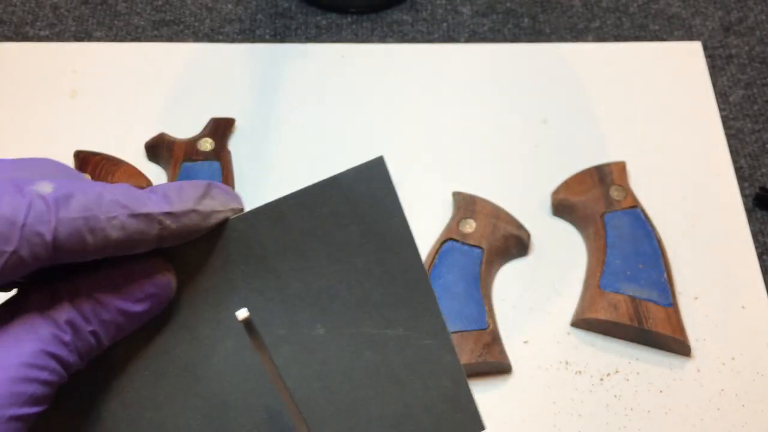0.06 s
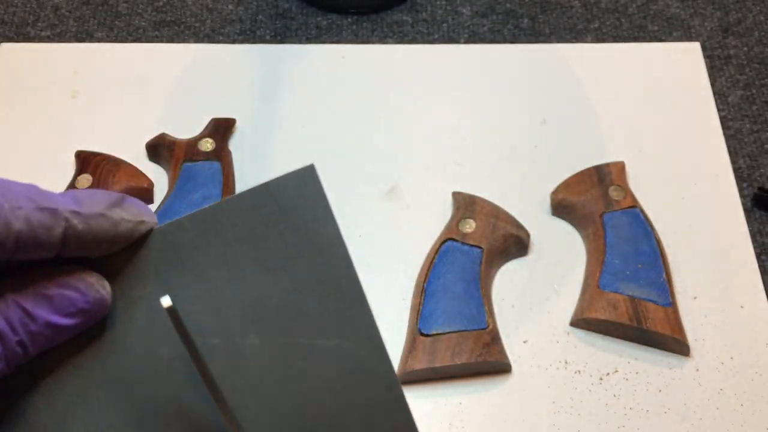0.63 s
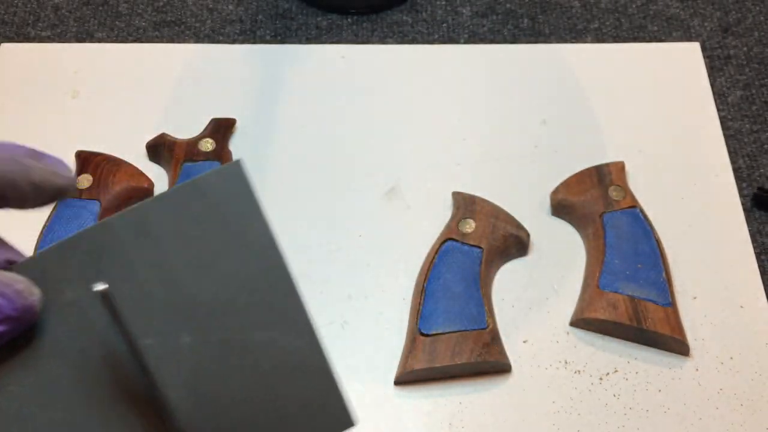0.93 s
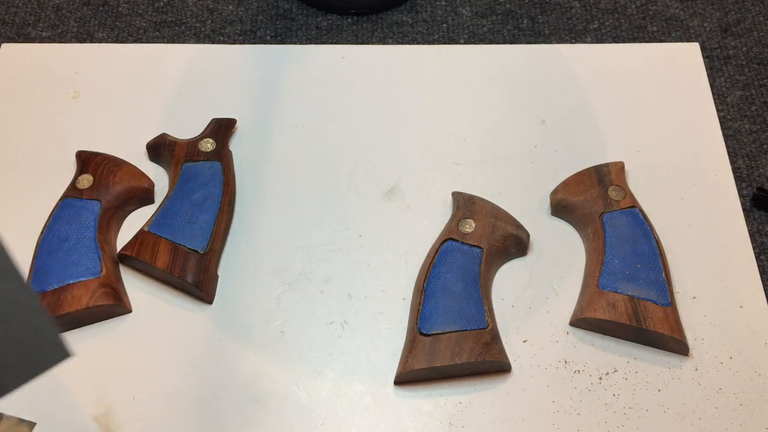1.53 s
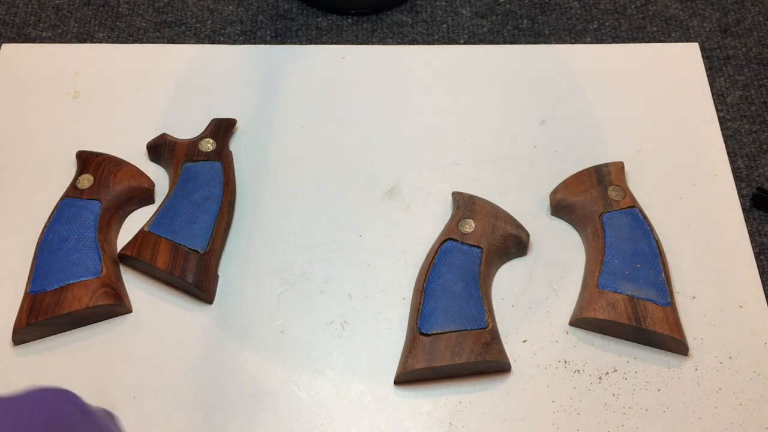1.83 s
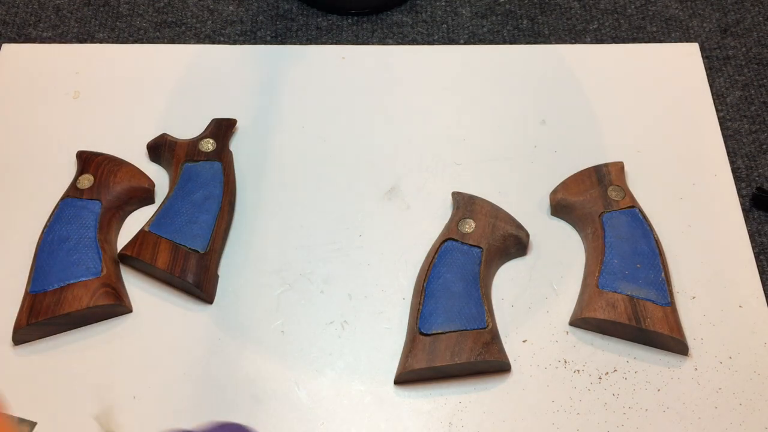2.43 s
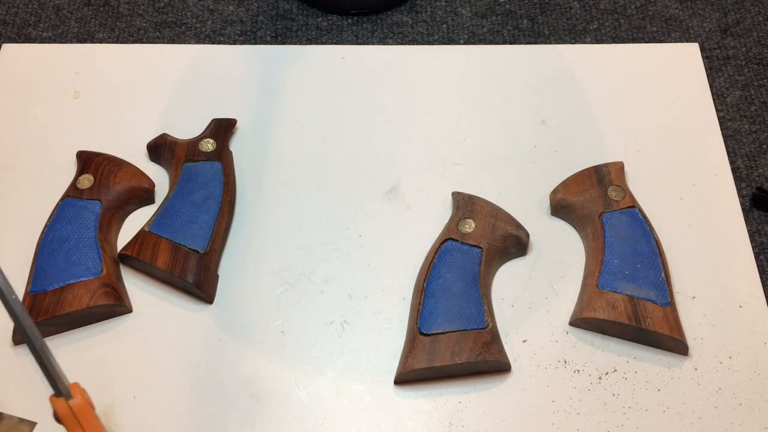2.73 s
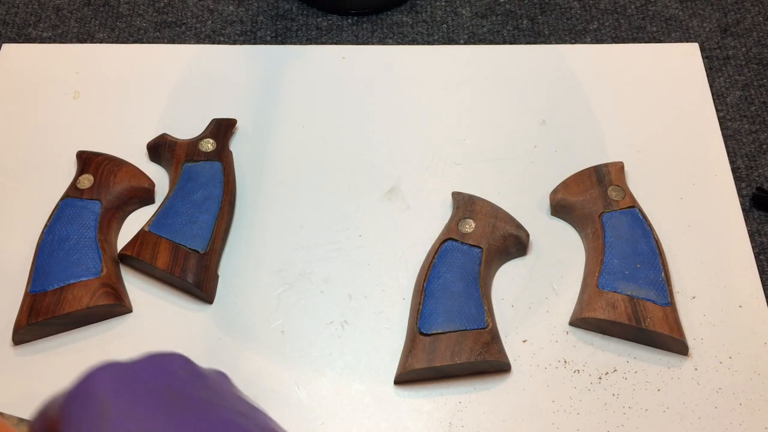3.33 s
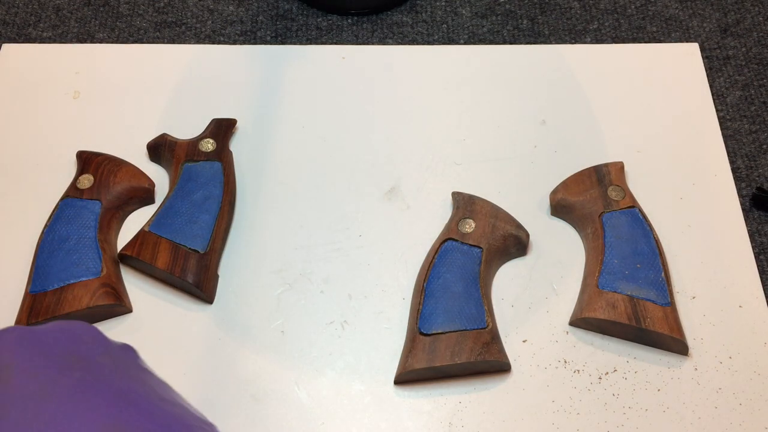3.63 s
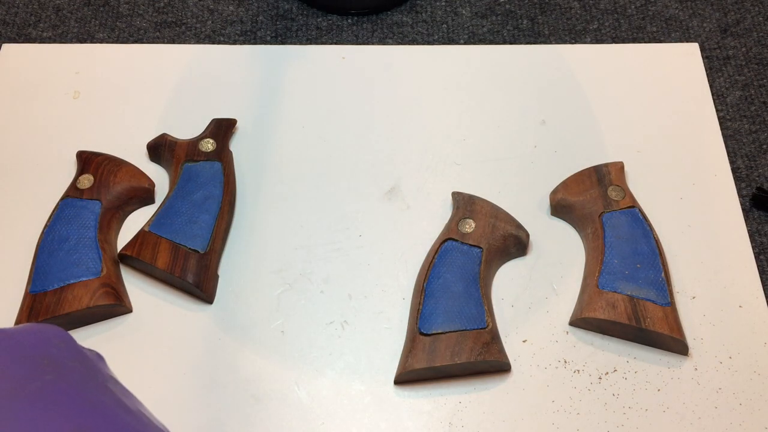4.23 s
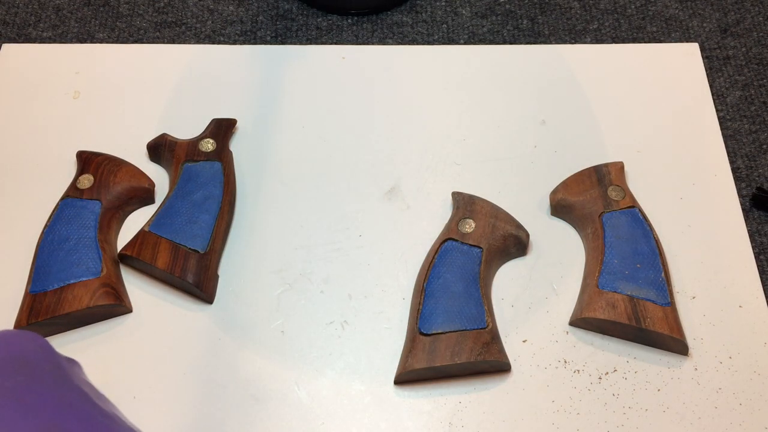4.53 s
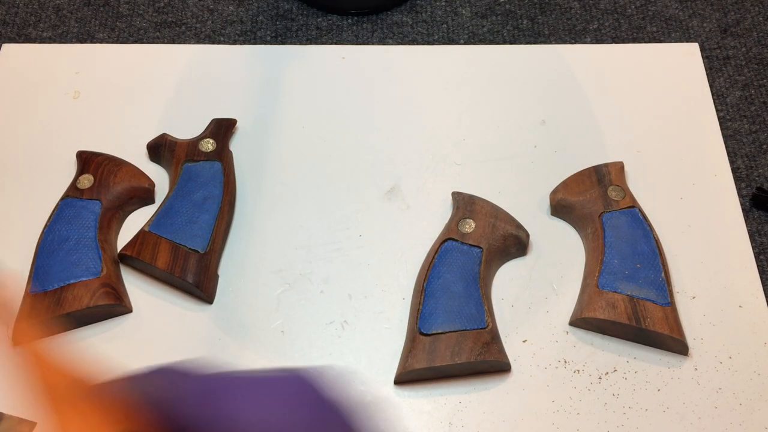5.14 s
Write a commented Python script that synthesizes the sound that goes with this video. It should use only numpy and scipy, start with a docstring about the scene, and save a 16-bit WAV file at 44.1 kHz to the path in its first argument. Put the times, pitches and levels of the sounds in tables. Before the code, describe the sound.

Sandpaper rustles and bumps a workbench, then scissors crunch through it and clack shut twice, close up in a quiet room.

```python
"""In a small room with a low ventilation hum, a sheet of sandpaper drags through gloved fingers by
stick-slip friction; it bumps the workbench, buckles, crinkles and flaps. At about 2 s scissors crunch
through the grit and clack shut, their blades ringing; tool and strip scrape, and the handles knock.
The paper slides and ticks under a rubbing, squeaking glove; a second cut ends just before 5 s.
All is close to the microphone, followed by scattering from the bench and a short reverberation."""
import sys
import numpy as np
from scipy import signal
from scipy.fft import rfft, irfft, next_fast_len
from scipy.io import wavfile
from scipy.ndimage import uniform_filter1d, map_coordinates

SR = 44100
rng = np.random.default_rng(int(sys.argv[2]) if len(sys.argv) > 2 else 0)


def master(y):
    """Save y as 16-bit WAV."""
    cut = np.clip(np.atleast_2d(y).T, -1, 1)
    pcm = np.round(cut * 32767)  # scale
    wavfile.write(sys.argv[1], SR, pcm.astype(np.int16))


N = 228349

# spectrum of the sandpaper as it is cut or crinkled: frequency_hz, gain_db
GRIT_COLOUR = [(180, -49.5), (300, -15.5), (656, -5), (737, -11), (1010, 1.5), (2030, -3.5), (2570, -2),
               (3890, -7), (5160, -5), (6850, -5.5), (9390, -16), (11500, -13.5), (13500, -21.5),
               (15000, -21.5), (16000, -28)]


def amp(db):
    """Decibels to amplitude ratio."""
    return 10 ** (np.asarray(db) / 20)


def unit(x):
    """Scale to rms 1."""
    return x / np.sqrt(np.mean(x ** 2) + 1e-20)


def peaked(x, size=128):
    """Scale so that the loudest few milliseconds have rms 1."""
    return x / np.sqrt(uniform_filter1d(x ** 2, size).max() + 1e-20)


def along(points, hz):
    """Interpolate (frequency_hz, value) points on a logarithmic frequency axis."""
    knots_hz, values = np.transpose(points)
    return np.interp(np.log(hz + 1), np.log(knots_hz + 1), values)


def wobble(rate):
    """A smooth random curve with rate knots a second."""
    knots = rng.standard_normal(int(N * rate / SR) + 4)
    return map_coordinates(knots, [np.arange(N) * rate / SR])


def add(track, start_s, sound):
    """Superpose a sound on the track."""
    part = track[round(start_s * SR):][:len(sound)]
    part += sound[:len(part)]


def coloured(x, colour, size=4096):
    """Minimum-phase filtering: folding the cepstrum makes the given spectrum causal."""
    gain = amp(along(colour, np.fft.rfftfreq(size, 1 / SR)))
    cepstrum = irfft(np.log(np.maximum(gain, 1e-6)))
    cepstrum[1:size // 2] *= 2
    cepstrum[size // 2 + 1:] = 0
    response = irfft(np.exp(rfft(cepstrum)))
    return signal.fftconvolve(x, response)[:len(x)]


def split(x, crossover_hz=4500):
    """A crossover divides a sound into body and treble."""
    return [signal.sosfilt(signal.butter(4, crossover_hz, side, fs=SR, output='sos'), x)
            for side in ('low', 'high')]


def volley(t60_s):
    """An exponentially decaying train of tiny impacts."""
    t = np.arange(SR // 4) / SR
    return rng.choice([-1, 1], len(t)) * amp(-60 * t / t60_s)


def burst(colour, t60_s, train_db=-13):
    """Impulse excitation: one sharp impact and a weaker volley drive a filter."""
    hits = amp(train_db) * volley(t60_s)
    hits[0] = 1
    return coloured(hits, colour)


def ringing(modes, scatter_db, attack_s, damping_db_per_s=0):
    """Free vibration: a sum of damped modes, excited a little differently at each blow."""
    t = np.arange(SR // 2) / SR
    ring = np.zeros(len(t))
    for hz, db, t60_s in modes:
        decay = amp(db + rng.normal(0, scatter_db) - 60 * t / t60_s)
        ring += decay * np.sin(2 * np.pi * (hz * t + rng.random()))
    onset = 1 - np.exp(-t / attack_s)
    return peaked(ring * onset * amp(-damping_db_per_s * t))


def stroke(start_s, rise_s, hold_s, curve, sag_db_per_s, release_db_per_s):
    """Envelope of one movement: a power-law rise, a slow sag, an exponential release."""
    t = np.arange(N) / SR - start_s
    rise = np.clip(t / rise_s, 0, 1) ** curve
    held_s = np.maximum(t - rise_s, 0)
    released_s = np.maximum(t - rise_s - hold_s, 0)
    return rise * amp(-sag_db_per_s * held_s - release_db_per_s * released_s)


def pressing(strokes, curve, sag_db_per_s, release_db_per_s, brighten):
    """Gains of body and treble: strokes add in power, and the treble grows faster with pressure."""
    body, treble = np.zeros(N), np.zeros(N)
    for start_s, rise_s, hold_s, level_db, treble_db in strokes:
        pressure = stroke(start_s, rise_s, hold_s, curve, sag_db_per_s, release_db_per_s)
        body = np.hypot(body, amp(level_db) * pressure)
        treble = np.hypot(treble, amp(level_db + treble_db) * pressure ** brighten)
    return body, treble


def grit(grains_per_s, spread_db):
    """Shot noise: grains catch at random moments, many faintly, a few strongly."""
    catches = rng.random(N) < grains_per_s / SR
    sizes = amp(spread_db * np.minimum(rng.standard_normal(N), 2))
    return unit(catches * sizes * rng.choice([-1, 1], N))


def bending(x, depth_db, size=512):
    """Time-varying filtering: the resonances of a sheet come and go as it bends."""
    spectra = signal.stft(x, nperseg=size)[2]
    field = uniform_filter1d(rng.standard_normal(spectra.shape), size=4, axis=0)  # across frequency
    field = uniform_filter1d(field, size=7, axis=1)  # across time
    return signal.istft(spectra * amp(depth_db * unit(field)), nperseg=size)[1][:N]


def friction(gains, colour, grains_per_s, spread_db, judder_db, bend_db):
    """Source and filter: grit drives a resonant body, and stick-slip makes the level judder."""
    body_gain, treble_gain = gains
    vibration = coloured(grit(grains_per_s, spread_db), colour)
    body, treble = split(bending(vibration, bend_db))
    judder = unit(amp(judder_db * (wobble(200) + 0.78 * wobble(60))))
    return judder * (unit(body) * body_gain + unit(treble) * treble_gain)


def ventilation():
    """Broadband air noise lies under low tones that waver in amplitude and phase."""
    # ventilation tones: pitch_hz, level_db
    hum = [(60, -72), (186, -64), (220.5, -63)]
    # spectrum of the moving air: frequency_hz, gain_db
    air_colour = [(15, -62), (25, -27.5), (47, -8), (127, -8), (153, -12.5), (170, -2.5), (223, -5.5),
                  (317, -11), (503, -24.5), (863, -22), (1230, -29.5), (1650, -29), (1890, -31),
                  (4490, -35), (16000, -45.5)]
    t = np.arange(N) / SR
    tones = sum(amp(db + 3.1 * wobble(8.3)) * np.sin(2 * np.pi * hz * t + 0.84 * wobble(7.3))
                for hz, db in hum)
    air = unit(coloured(rng.standard_normal(N), air_colour))
    return tones + amp(-61.5) * air


def drags():
    """Stick-slip friction: the sheet drags through gloved fingers."""
    # pulls on the sheet: start_s, rise_s, hold_s, level_db, relative_treble_db
    pulls = [(0.0, 0.0029, 0.014, -62, -3), (0.323, .016, 0.076, -55.5, -18),
             (0.6, 0.013, 0.013, -53, -19.5), (0.625, 0.13, .062, -39.5, -11.5),
             (0.875, 0.013, 0.059, -66.5, -10), (0.97, 0.028, 0.026, -59, -12),
             (1.025, 0.037, 0.077, -39.5, -6), (1.172, 0.024, 0.019, -40.5, -6.5),
             (1.31, .016, 0.0059, -41, -7.5), (1.342, 0.017, 0.0088, -37.5, -11),
             (1.399, 0.0085, 0.0043, -41.5, -15), (1.428, 0.013, 0.051, -56.5, -12.5),
             (1.502, 0.025, 0.15, -38.5, -11.5)]
    # spectrum of the dragged sheet: frequency_hz, gain_db
    colour = [(240, -61.5), (400, -17.5), (935, -2.5), (1220, -9.5), (1600, 2.5), (1870, 0.5), (2400, -4.5),
              (2930, -5), (3260, -12.5), (3640, -11.5), (4880, -19), (6440, -13), (9760, -26.5),
              (12300, -22.5), (16000, -32.5)]
    gains = pressing(pulls, curve=1.6, sag_db_per_s=7, release_db_per_s=600.5, brighten=1.2)
    return friction(gains, colour, grains_per_s=12000, spread_db=3.5, judder_db=1.94, bend_db=3.0)


def bumps():
    """Soft impacts excite the low modes of the bench top."""
    # hand and sheet meet the bench: start_s, peak_db
    pushes = [(0.034, -47.5), (0.112, -30.5), (0.756, -36.5), (0.937, -50), (1.292, -54), (2.118, -45.5),
              (5.053, -61.5)]
    # modes of the bench top: pitch_hz, gain_db, t60_s
    modes = [(76, -6, 0.16), (127, -4.5, 0.13), (184, 1.5, .06), (290.7, -4.5, 0.15), (382, -1, 0.095),
             (596.5, -8.5, 0.093)]
    out = np.zeros(N)
    for start_s, peak_db in pushes:
        add(out, start_s, amp(peak_db) * ringing(modes, scatter_db=3.1, attack_s=0.0016))
    return out


def buckles():
    """Snap-through buckling: the stiff sheet gives a pop with a shorter bright tick on it."""
    # snaps of the sheet: start_s, peak_db, relative_treble_db
    snaps = [(0.099, -27.5, -48), (0.102, -27, -36), (0.108, -18, -24), (0.11, -17, -14.5),
             (0.767, -27.5, -20), (1.258, -29, -14.5), (1.358, -34.5, -14), (1.326, -39, -10),
             (1.405, -35, -19.5), (1.781, -50, -18.5), (2.22, -34.5, -8), (2.453, -48.5, -13.5),
             (2.476, -45, -12), (2.52, -47.5, -13), (4.593, -64, -20)]
    # spectrum of a snap: frequency_hz, gain_db
    colour = [(180, -39.5), (300, -15), (1530, -2), (1810, -6), (2700, -10), (2930, -10), (3760, -16),
              (4750, -19), (5250, -23), (6520, -21), (10000, -33.5), (11500, -27), (16000, -34.5)]
    out = np.zeros(N)
    for start_s, peak_db, treble_db in snaps:
        pop = peaked(split(burst(colour, t60_s=0.029, train_db=-14.5))[0])
        tick = peaked(split(burst(colour, t60_s=0.012))[1])
        add(out, start_s, amp(peak_db) * (pop + amp(treble_db) * tick))
    return out


def crinkles(count=26):
    """Crackling noise: the held sheet gives faint ticks at random times."""
    out = np.zeros(N)
    for when, size in rng.random((count, 2)):
        tick = peaked(burst(GRIT_COLOUR, t60_s=0.04, train_db=-5.5))
        add(out, when * N / SR, amp(-70 + 6.1 * size) * tick)
    return out


def flap():
    """Flexural vibration: the whole sheet bends and sounds its low resonances."""
    # bends of the sheet: start_s, rise_s, hold_s, level_db
    flexes = [(0.744, .02, .004, -35.5)]
    # spectrum of the flexing sheet: frequency_hz, gain_db
    colour = [(88, -50), (150, 9.5), (252, -4), (409, 6.5), (540, 6), (668, 6.5), (1230, -7), (1500, -20),
              (1950, -59), (3300, -120)]
    bend = sum(amp(level_db) * stroke(*timing, curve=1.5, sag_db_per_s=41, release_db_per_s=191)
               for *timing, level_db in flexes)
    return bend * unit(coloured(grit(grains_per_s=2500, spread_db=4.5), colour))


def cuts():
    """Shear: the blades crunch through the grit ever harder; a fading tail follows each snip."""
    # closing strokes of the blades: start_s, rise_s, hold_s, level_db, relative_treble_db
    squeezes = [(2.062, 0.0402, .015, -28.5, -3.5), (2.215, .006, .021, -38, -6.5),
                (4.808, .044, 0.021, -39, 0.5)]
    # tails of ring, room and settling paper: start_s, rise_s, hold_s, level_db, relative_treble_db
    tails = [(2.12, 0.0067, .01, -42, -4.5), (4.882, 0.00605, 0.0055, -50, 3.5)]
    squeeze = pressing(squeezes, curve=1.0, sag_db_per_s=40, release_db_per_s=1099.5, brighten=1.7)
    tail = pressing(tails, curve=1.1, sag_db_per_s=21, release_db_per_s=91.5, brighten=1.3)
    gains = np.hypot(squeeze, tail)
    return friction(gains, GRIT_COLOUR, grains_per_s=14000, spread_db=4.0, judder_db=2.5, bend_db=1.5)


def clicks(ring_db=-29.5, damping_db_per_s=79.5):
    """Impulsive transients: blade clacks and small ticks of the rubbed paper, each with a faint ring."""
    # sharp clicks: start_s, peak_db, relative_treble_db
    impulses = [(2.111, -26, 9.5), (2.118, -30.5, -7), (2.24, -37.5, -1), (2.38, -55, 6),
                (2.437, -46.5, -7), (2.509, -49.5, -2.5), (2.57, -56.5, -10), (2.809, -54, -4.5),
                (2.946, -35.5, -3), (3.823, -47.5, 0), (3.847, -47, -22), (4.875, -36, 1.5),
                (4.88, -21.5, 2), (5.016, -47, -2)]
    # spectrum of a click: frequency_hz, gain_db
    colour = [(240, -49.5), (400, -17), (1180, -7.5), (1760, -13.5), (2550, 1), (2930, -9.5), (3930, -11),
              (4310, 0.5), (4800, -7.5), (5350, -0.5), (7750, -5.5), (9320, -17.5), (11400, -9.5),
              (14800, -20.5), (16000, -28)]
    # modes of the steel blades: pitch_hz, gain_db, t60_s
    modes = [(4470, -8.5, 0.93), (5604, 4, 0.23), (6500, -4.5, 0.34), (7500, -12, 0.32), (11100, -11, 0.3),
             (11800, -6.5, 0.19), (13450, -9.5, 0.27)]
    out = np.zeros(N)
    for start_s, peak_db, treble_db in impulses:
        body = peaked(split(burst(colour, t60_s=0.01507, train_db=-6.5))[0])
        treble = peaked(split(burst(colour, t60_s=0.011, train_db=-5))[1])
        ring = ringing(modes, scatter_db=2.5, attack_s=0.001, damping_db_per_s=damping_db_per_s)
        add(out, start_s, amp(peak_db) * (body + amp(treble_db) * treble))
        add(out, start_s, amp(peak_db + treble_db + ring_db) * ring)
    return out


def scrapes():
    """Coarse friction: scissors and cut strip pass each other in sparse, uneven catches."""
    # touches of tool and strip: start_s, rise_s, hold_s, level_db, relative_treble_db
    touches = [(2.373, 0.0063, 0.0094, -54, 4), (2.4, 0.035, .09, -57.5, -9.5),
               (2.5, 0.018, 0.0044, -48.5, -10.5), (2.8, 0.098, .14, -53, -1),
               (2.91, 0.036, .002, -39.5, -2.5)]
    # spectrum of the scraping: frequency_hz, gain_db
    colour = [(260, -38), (450, -16), (538, -22), (616, -6.5), (726, -20), (1050, -7.5), (1650, -12.5),
              (2100, -4), (2960, -9.5), (4300, -13.5), (6240, -7), (10400, -17), (11900, -9.5),
              (16000, -25.5)]
    gains = pressing(touches, curve=1.26, sag_db_per_s=4, release_db_per_s=314, brighten=1.35)
    return friction(gains, colour, grains_per_s=5000, spread_db=5.0, judder_db=2.0, bend_db=3)


def knocks():
    """Heavily damped modes: the plastic handles meet with a short, hollow knock."""
    # blows of handle on handle: start_s, peak_db
    blows = [(2.858, -40), (2.946, -39), (2.974, -45.5)]
    # modes of the handles: pitch_hz, gain_db, t60_s
    modes = [(1062, -3, 0.033), (1410, -13, 0.032), (2095, -3, 0.075), (2520, -20, 0.13)]
    out = np.zeros(N)
    for start_s, peak_db in blows:
        knock = ringing(modes, scatter_db=4, attack_s=0.00082, damping_db_per_s=900)
        add(out, start_s, amp(peak_db) * knock)
    return out


def slides():
    """Light sliding friction: dense, even catches of the paper merge into a hiss."""
    # glides of the paper: start_s, rise_s, hold_s, level_db, relative_treble_db
    glides = [(3.05, 0.023, 0.013, -60.5, -1), (3.105, 0.054, 0.15, -56, 3), (3.31, 0.078, .045, -57, 7)]
    # spectrum of the sliding paper: frequency_hz, gain_db
    colour = [(530, -52), (900, -20.5), (1090, -8), (1390, -11.5), (2040, -1), (2960, -2.5), (3340, -5.5),
              (6030, -1), (10000, -8.5), (11700, -3), (16000, -13)]
    gains = pressing(glides, curve=0.8, sag_db_per_s=24, release_db_per_s=330, brighten=1.6)
    return friction(gains, colour, grains_per_s=20000, spread_db=0.5, judder_db=1.1, bend_db=4.5)


def rubs():
    """Stick-slip friction: a glove rubs on the paper."""
    # strokes of the glove: start_s, rise_s, hold_s, level_db, relative_treble_db
    grips = [(3.691, 0.0027, .195, -55.5, 0.5), (3.8, 0.042, .01, -53.5, -7),
             (4.11, 0.027, 0.015, -74.5, -7.5)]
    # spectrum of glove on paper: frequency_hz, gain_db
    colour = [(410, -38), (700, -17.5), (997, -1), (1200, -20.5), (1560, -9), (1770, -12), (2630, 2),
              (3240, -5), (3790, -3), (4490, -8.5), (5840, -5), (7590, -17), (11800, -14), (16000, -28)]
    gains = pressing(grips, curve=0.85, sag_db_per_s=20.5, release_db_per_s=750, brighten=1.57)
    return friction(gains, colour, grains_per_s=10000, spread_db=4.5, judder_db=1.45, bend_db=2.5)


def squeak(start_s=3.695, sink=0.14, sink_s=0.042, t60_s=0.18):
    """Friction-excited resonance: the glove squeaks faintly, sinking in pitch as it slows."""
    # resonances of the glove as it takes hold: pitch_hz, level_db
    resonances = [(1120, -52), (1740, -50), (2380, -54)]
    t = np.arange(N) / SR
    pitch_ratio = 1 - sink * (1 - np.exp(-t / sink_s))
    travel = np.cumsum(pitch_ratio) / SR
    tones = sum(amp(db) * np.sin(2 * np.pi * hz * travel + 0.26 * wobble(194)) for hz, db in resonances)
    envelope = (1 - np.exp(-t / 0.0033)) * amp(-60 * t / t60_s)
    out = np.zeros(N)
    add(out, start_s, tones * envelope)
    return out


def room(x, bench_db, tail_db):
    """Early reflections off small things on the bench scatter the treble; reverberation follows."""
    # reverberation time of the room: frequency_hz, t60_s
    decay_times = [(150, 0.4), (800, 0.25), (3000, 0.37), (5500, 0.37), (9000, 0.46), (15000, 0.27)]
    hz, t, spectra = signal.stft(rng.standard_normal(SR // 2), SR, nperseg=256)
    decay = amp(-60 * t / along(decay_times, hz)[:, None])
    tail = signal.istft(spectra * decay, SR, nperseg=256)[1]
    tail = coloured(tail, [(100, -4.5), (1000, -4), (3500, -4.0), (8000, -3.5), (16000, -7)])
    early = coloured(volley(t60_s=0.023), [(500, -12.5), (2000, -3.5), (5000, -1.0), (16000, -6.5)])
    response = np.zeros(SR)
    add(response, 0.001, amp(bench_db) * early / np.linalg.norm(early))
    add(response, 0.007, amp(tail_db) * tail / np.linalg.norm(tail))
    return signal.fftconvolve(x, response)[:N]


def scene():
    """Superposition: the direct sound of paper and scissors, its reflections and the room's hum."""
    handling = drags() + bumps() + buckles() + crinkles() + flap() + slides() + rubs() + squeak()
    direct = handling + cuts() + clicks() + scrapes() + knocks()
    return (direct + room(direct, bench_db=-12.5, tail_db=-20.0) + ventilation())[None]


def record(dry, low_cut_hz=42, top_hz=15900):
    """Band limiting: the microphone sheds deep rumble, and nothing above top_hz is kept."""
    heard = signal.sosfilt(signal.butter(2, low_cut_hz, 'high', fs=SR, output='sos'), dry)
    size = next_fast_len(N + SR // 2)
    passband = np.fft.rfftfreq(size, 1 / SR) < top_hz
    return irfft(rfft(heard, size) * passband, size)[:, :N]


dry = scene()
out = record(dry)
master(out)
```